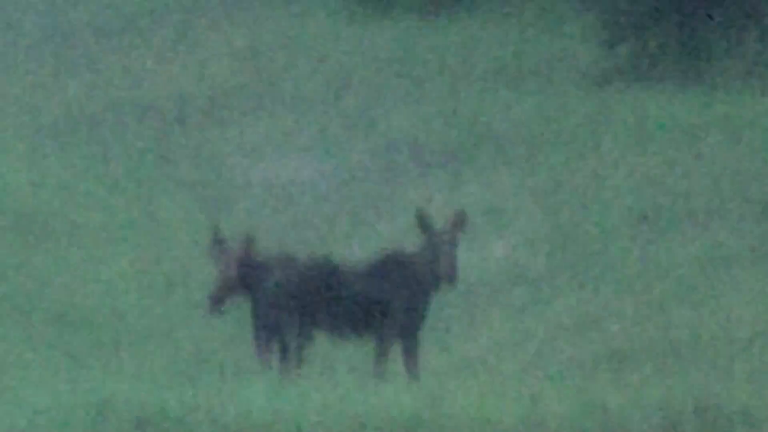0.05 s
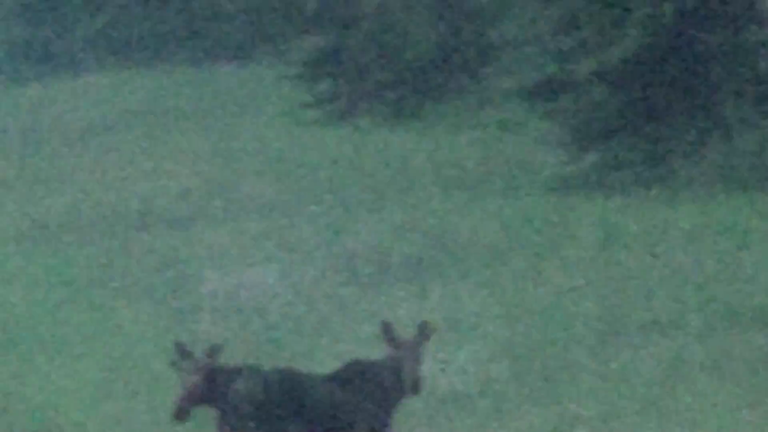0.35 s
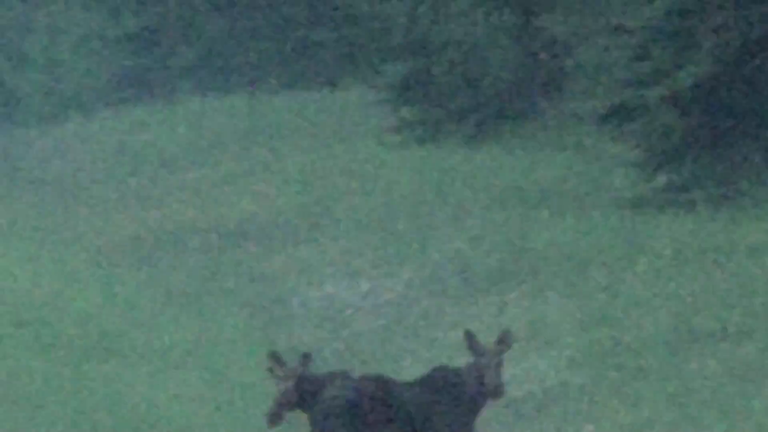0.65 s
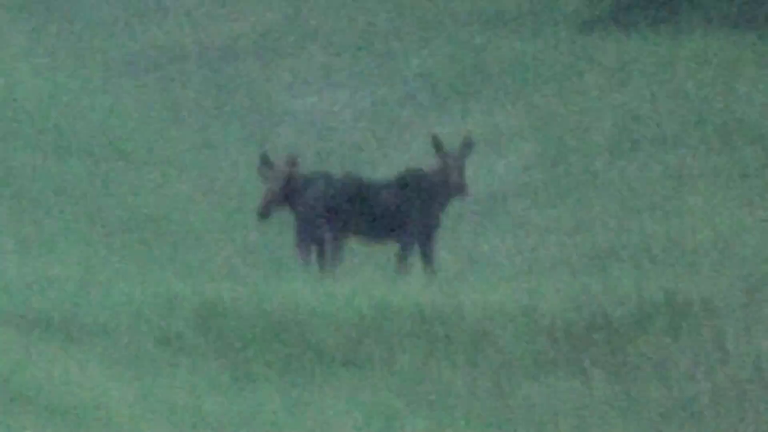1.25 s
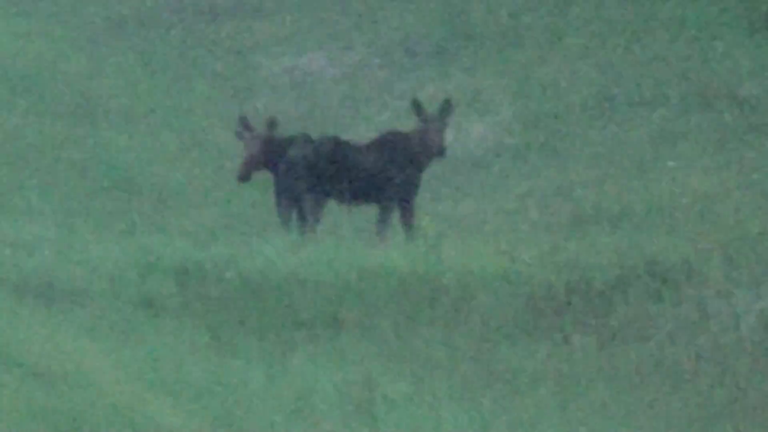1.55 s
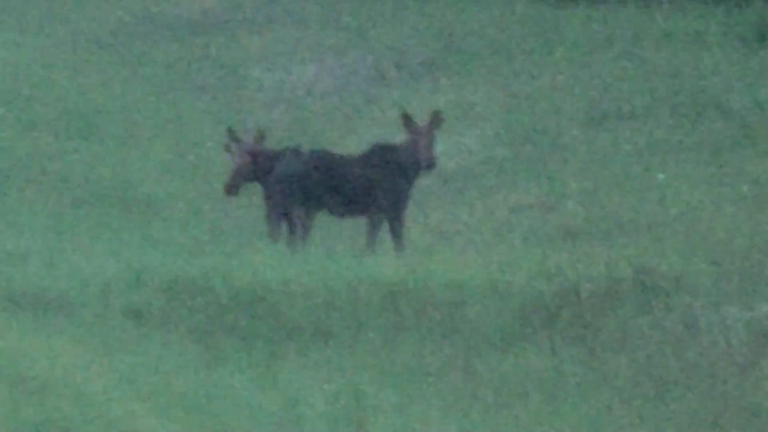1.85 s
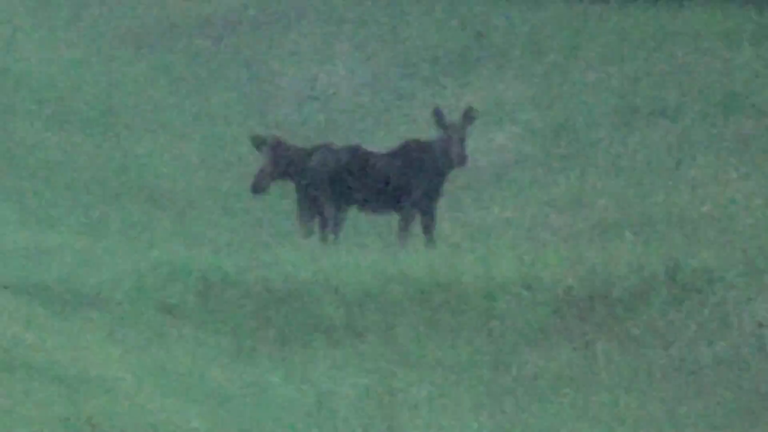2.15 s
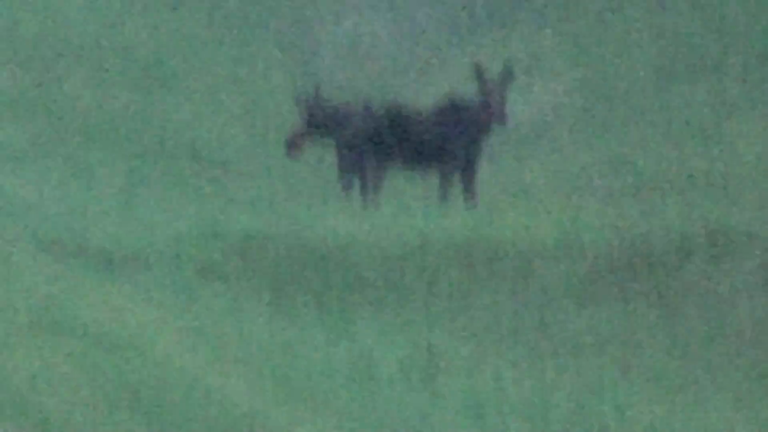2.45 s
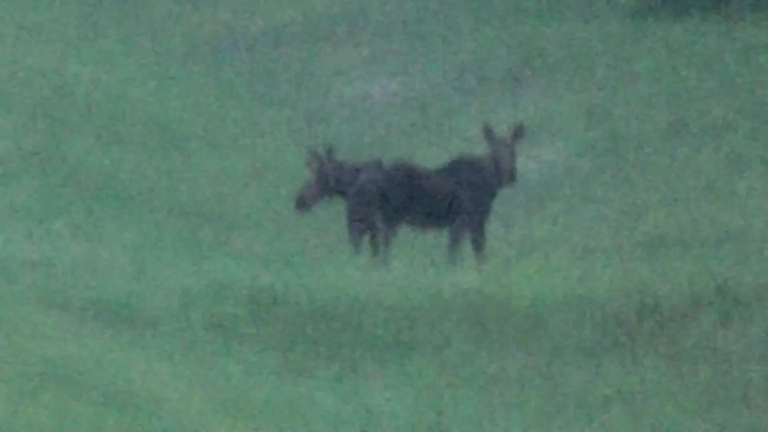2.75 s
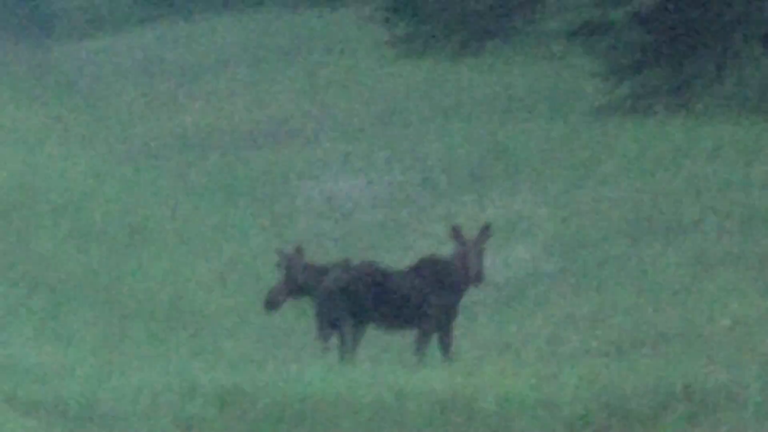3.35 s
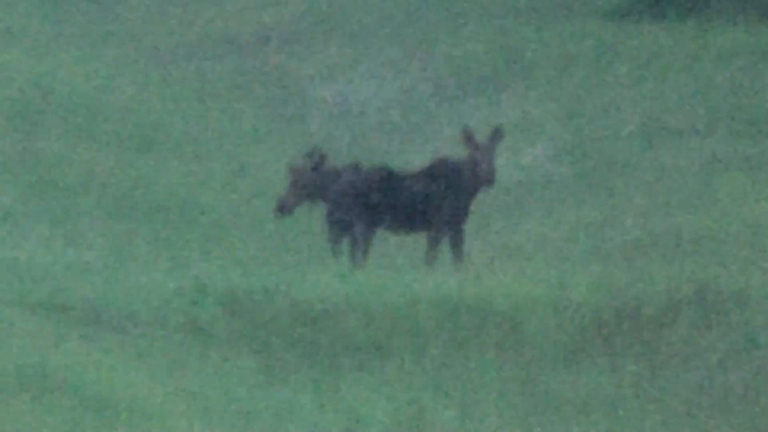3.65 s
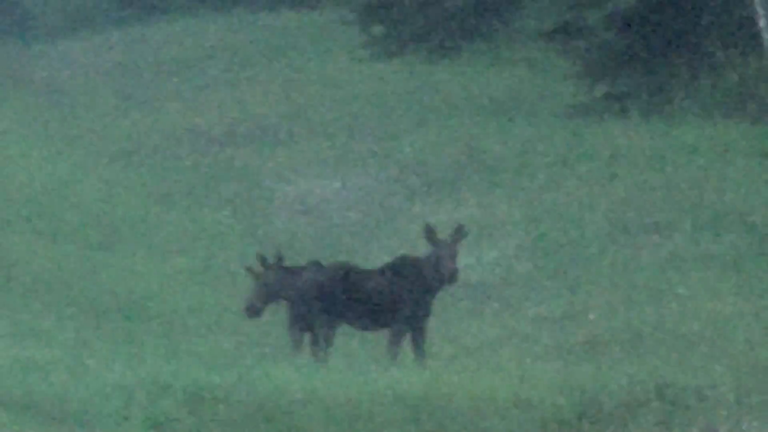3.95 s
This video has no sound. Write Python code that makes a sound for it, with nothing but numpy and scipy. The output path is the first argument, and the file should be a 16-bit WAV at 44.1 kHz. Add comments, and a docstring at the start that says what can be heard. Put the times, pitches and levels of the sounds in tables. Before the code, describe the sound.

One long moose call slides down in pitch, grows buzzier and drops into a growl, echoing faintly off trees. Small clicks and bumps from the hand-held camera follow, with far bird whistles and an even hiss outdoors.

```python
"""An open field: one long moose-like bellow. Vocal-fold pulses ring throat and muzzle in a slowly
sinking tone that turns rough three times, brightens as the mouth opens and drops into a short growl.
A faint echo comes back from the trees. A small bird whistles far away.
A hand-held camera clicks, bumps, rustles and whines over an even hiss."""
import sys
import numpy as np
from scipy import signal
from scipy.fft import rfft, irfft
from scipy.io import wavfile
from scipy.ndimage import uniform_filter1d

SR = 44100
rng = np.random.default_rng(int(sys.argv[2]) if len(sys.argv) > 2 else 0)


def dump_mix(stems):
    """Bounce the given channels to the path in sys.argv[1] as a 16-bit WAV at rate SR."""
    frames = np.atleast_2d(stems).T  # one column per channel
    limited = np.clip(frames, -1, 1)  # hard clip at full scale
    pcm = np.round(limited * 32767).astype(np.int16)
    wavfile.write(sys.argv[1], SR, pcm)


N = 176400


def undb(db):
    """Decibels to gain."""
    return 10 ** (np.asarray(db) / 20)


def unit(x):
    """Scale to rms 1."""
    return x / np.sqrt(np.mean(x ** 2))


def on_log(points, hz):
    """Interpolate (freq_hz, value) points on a log-frequency axis."""
    freqs, values = np.array(points, float).T
    return np.interp(np.log(hz + 1), np.log(freqs), values)


def curves(table, x):
    """Interpolate the other columns along the first."""
    axis, *columns = np.array(table).T
    return [np.interp(x, axis, column) for column in columns]


def swell(t, peak_s, spread_s):
    """Bell envelope, peak 1."""
    return np.exp(-((t - peak_s) / spread_s) ** 2)


def wander(rate_hz):
    """Smooth random drift, rms 1."""
    hold = max(int(SR / rate_hz), 2)
    steps = np.repeat(rng.standard_normal(N // hold + 1), hold)
    return unit(uniform_filter1d(uniform_filter1d(steps, hold), hold)[:N])


def band_noise(low_hz, high_hz):
    """Band-passed noise, rms 1."""
    sos = signal.butter(3, [low_hz, high_hz], "band", fs=SR, output="sos")
    return unit(signal.sosfilt(sos, rng.standard_normal(N)))


def below(hz, edge_hz, power=32):
    """Gain of a steep low-pass."""
    return 1 / np.sqrt(1 + (hz / edge_hz) ** power)


def resonance(hz, centre_hz, half_width_hz):
    """Complex gain of a resonance applied twice, 1 at the centre."""
    return 1 / (1 + 1j * (hz - centre_hz) / half_width_hz) ** 2


def tap(age_s, modes):
    """Decaying modes struck at age 0."""
    age_s = np.clip(age_s, 0, .5)
    attack = 1 - np.exp(-age_s / 0.00025)
    return attack * sum(undb(db - 60 * age_s / t60_s) * np.sin(2 * np.pi * hz * age_s)
                        for hz, db, t60_s in modes)


# freq_hz, gain_db
HISS_SPECTRUM = [(25, -15), (86, -4.5), (322, -4.5), (1200, -10.5), (15500, -17.5)]


def hiss(level_db=-54.5, side_db=-20):
    """Even hiss of field and camera, nearly mono."""
    shape = undb(on_log(HISS_SPECTRUM, np.fft.rfftfreq(N, 1 / SR)))
    mid, side = (unit(irfft(rfft(rng.standard_normal(N)) * shape, N)) for _ in range(2))
    return undb(level_db) * (mid + undb(side_db) * np.array([side, -side]))


def motor_whine(t, pitch_hz=2512, rms_db=-71):
    """Thin steady tone of the camera motor."""
    return np.sqrt(2) * undb(rms_db) * np.sin(2 * np.pi * pitch_hz * t)


# start_s, length_s, from_hz, to_hz, level_db
BIRD_NOTES = [(0.29, 0.12, 3600, 3020, -52), (0.665, 0.055, 3300, 2900, -59),
              (3.905, 0.22, 4330, 4480, -58.5)]


def bird(t):
    """Distant gliding whistles."""
    out = 0
    for start_s, length_s, from_hz, to_hz, db in BIRD_NOTES:
        progress = np.clip((t - start_s) / length_s, 0, 1)
        hz = from_hz + (to_hz - from_hz) * progress
        out += undb(db) * np.sin(np.pi * progress) * np.sin(2 * np.pi * np.cumsum(hz) / SR)
    return out


# peak_s, spread_s, level_db, centre_hz
GRIP_RUSTLES = [(.355, .03, -53, 1750), (3.37, .03, -55.5, 1100), (3.83, .04, -54.5, 1000)]


def grip_rustles(t, grain_rate_hz=130):
    """The grip rubs the camera: grainy octave-wide noise."""
    out = 0
    for peak_s, spread_s, db, hz in GRIP_RUSTLES:
        grains = np.abs(wander(grain_rate_hz))
        out += undb(db) * swell(t, peak_s, spread_s) * grains * band_noise(hz / 2 ** .5, hz * 2 ** .5)
    return out


# peak_s, spread_s, level_db
HAND_BUMPS = [(2.943, 0.02, -45.5), (3.552, .008, -52), (3.624, 0.0059, -50), (3.977, 0.0049, -49)]


def hand_bumps(t, pitch_hz=301, rub_db=-8.5):
    """The hand bumps the camera: soft thuds with rubbing noise."""
    out = 0
    for peak_s, spread_s, db in HAND_BUMPS:
        thud = np.sin(2 * np.pi * pitch_hz * t + .5 * wander(pitch_hz / 2))
        rub = undb(rub_db) * band_noise(pitch_hz, 800)
        out += undb(db) * swell(t, peak_s, spread_s) * (thud + rub)
    return out


# freq_hz, gain_db, t60_s
KNOCK_MODES = [(350, -7, 0.015), (726, 8.5, 0.019), (1010, 4, 0.0083)]


def camera_knock(t, start_s=3.0638, gain_db=-38.5):
    """One knock rings the low modes of the camera body."""
    return undb(gain_db) * tap(t - start_s, KNOCK_MODES)


# pitch_ratio, gain_db
SHELL_MODES = [(.84, -2.5), (1, 2.5), (1.14, 1.5), (1.551, -5.5)]
# start_s, gain_db, pitch_hz, left_minus_right_db
SHELL_CLICKS = [(0.1655, -33.5, 5150, 4), (0.1968, -30, 3720, 2.5), (0.311, -31, 5060, -4),
                (2.654, -30, 5060, 3), (3.0636, -33, 4930, 3), (3.7317, -28, 4000, 3.5)]


def shell_clicks(t, t60_s=0.0067):
    """The camera's plastic shell clicks and rings briefly."""
    out = np.zeros((2, N))
    for start_s, db, pitch_hz, pan_db in SHELL_CLICKS:
        modes = [(ratio * pitch_hz, mode_db, t60_s) for ratio, mode_db in SHELL_MODES]
        pan = undb([[pan_db / 2], [-pan_db / 2]])
        out += undb(db) * pan * tap(t - start_s, modes)
    return out


def tree_echo(call, t, level_db=-16.5, t60_s=0.47, delay_s=0.01):
    """The trees scatter the call back as a weak diffuse tail."""
    decay = undb(-60 * t / t60_s) * (t > delay_s)
    tails = [unit(decay * rng.standard_normal(N)) / np.sqrt(N) for _ in range(2)]
    mid, side = (signal.fftconvolve(call, tail)[:N] for tail in tails)
    return undb(level_db) * (mid + 0.45 * np.array([side, -side]))


# freq_hz, left_minus_right_db, left_lead_rad
MIC_BALANCE = [(150, 0.04, -0.13), (600, 0.5, -.42), (1200, 4, -0.47), (3500, 4.5, -0.88)]


def direct_path(call):
    """The call at the two microphone ports, louder on the left."""
    pan_db, lead_rad = curves(MIC_BALANCE, np.fft.rfftfreq(N, 1 / SR))
    ports = [undb(side * pan_db / 2) * np.exp(.5j * side * lead_rad) for side in (1, -1)]
    return np.array([irfft(rfft(call) * port, N) for port in ports])


# freq_hz, gain_db
THROAT_RESPONSE = [(40, -64), (110, -22), (170, -19.5), (220, -8.5), (290, -24), (420, -20), (520, -11.5),
                   (600, -6), (700, -17.5), (800, -4.5), (900, 1.5), (980, -16), (1060, -12.5),
                   (1170, -15.5), (1320, -9), (1500, -26.5)]
# centre_hz, half_width_hz, depth_db
REFLECTION_NOTCHES = [(469.8, 12, 21), (549.2, 6.5, 27.5), (742, 8.2, 33.5), (864.7, 54, 9.5)]
# centre_hz, half_width_hz
DELAYED_BANDS = [(830, 128), (1080, 84)]


def throat_and_reflections(source):
    """Throat and muzzle resonances; nearby reflections cut narrow notches into the call."""
    hz = np.fft.rfftfreq(16384, 1 / SR)
    notch_db = sum(db / (1 + ((hz - centre) / width) ** 2) for centre, width, db in REFLECTION_NOTCHES)
    cepstrum = irfft(np.log(undb(on_log(THROAT_RESPONSE, hz) - notch_db)))
    half = len(cepstrum) // 2
    cepstrum[1:half] *= 2  # fold to minimum phase
    cepstrum[half + 1:] = 0
    # two bands of each pulse arrive late
    lag_rad = 2 * sum(np.arctan((hz - centre) / width) + np.arctan((hz + centre) / width)
                      for centre, width in DELAYED_BANDS)
    impulse = irfft(np.exp(rfft(cepstrum) - 1j * lag_rad))[:half]
    return signal.fftconvolve(source, impulse)[:N]


# time_s, pitch_hz
FOLD_PITCH = [(0.0, 226.9), (0.091, 209.8), (0.25, 203), (0.449, 199.6), (0.558, 193.4), (0.635, 193.2),
              (0.744, 187), (0.925, 190.6), (0.975, 184.8), (1.048, 189.1), (1.193, 187.6), (1.279, 179.8),
              (1.361, 182.7), (1.524, 175.2), (1.619, 178.4), (1.701, 174.2), (1.814, 174.8), (1.9, 170.8),
              (2.2, 163.3), (2.454, 146.9), (2.499, 140.7), (2.571, 117.8), (2.676, 77)]
# start_s, end_s, sway_to_pitch_ratio, depth
ROUGH_STRETCHES = [(-.02, 0.1, 0.5, 0.36), (1.378, 1.66, 0.315, 0.34), (2.034, 2.21, 0.27, 0.12),
                   (2.492, 2.663, .37, .16)]
JITTER, GROWL_JITTER, QUAVER = 0.0015, 0.01258, 0.001214  # fractions of pitch


def vocal_folds(t, growl_s=2.5, fade_s=0.012, sway_rad=0.094, scatter=.15, shimmer=0.0076):
    """Fold cycles; in rough stretches a second vibration makes every few pulses strong and early."""
    growl = np.clip((t - growl_s) / 0.054, 0, 1)
    jitter = (JITTER + GROWL_JITTER * growl) * wander(150)
    pitch_hz = curves(FOLD_PITCH, t)[0] * (1 + jitter + QUAVER * wander(20))
    phase = 2 * np.pi * np.cumsum(pitch_hz) / SR
    uneven, slip_rad = (scatter * wander(60.3) for _ in range(2))
    sway = 0
    for start_s, end_s, ratio, depth in ROUGH_STRETCHES:
        gate = np.clip(np.minimum(t - start_s, end_s - t) / fade_s + .5, 0, 1)
        sway += depth * gate * (1 + uneven) * np.cos(ratio * phase + slip_rad)
    level_swing = sway + shimmer * wander(200)
    return pitch_hz, phase + sway_rad * sway, level_swing


def breath(phase, body, buzz, rasp, low_db=-24.5, high_db=-15.5):
    """Turbulent air, one puff per fold cycle."""
    high = buzz * band_noise(990, 3000) + rasp * band_noise(3600, 4700)
    low = body * band_noise(290, 2300)
    return (1 + np.cos(phase)) * (undb(low_db) * low + undb(high_db) * high)


# time_s, body_gain_db, body_edge_hz, buzz_gain_db, rasp_gain_db
CALL_EFFORT = [(0.0, -12.5, 990, -52, -61), (0.08, -19.5, 1170, -48, -44), (0.15, -17, 1205, -47, -37.5),
               (0.45, -15, 1247, -44.5, -44), (0.57, -15.5, 1178, -44, -35.5),
               (0.75, -19.5, 1249, -42, -33), (1.0, -16, 1212, -39.5, -29),
               (1.35, -17.5, 1191, -38.5, -30.5), (2.02, -16, 1216, -36, -33.5),
               (2.25, -14.5, 1224, -27, -24.5), (2.43, -16.5, 1281, -27, -25.5),
               (2.5, -17, 1324, -26, -22.5), (2.61, -20.5, 1398, -27.5, -15), (2.64, -24, 1358, -37, -26),
               (2.68, -64, 1385, -48, -65.0)]
# time_s, buzz_hz, rasp_hz
MOUTH_RESONANCES = [(.3, 2480, 3990), (1.1, 2110, 4083), (1.5, 1870, 3974), (2.3, 1775, 3830)]
# centre_hz, half_width_hz, gain_db, peak_s, spread_s
REEDY_OVERTONES = [(3030, 87, -40, .95, 0.7), (3590, 77, -34, 0.83, 0.61), (4620, 313, -35.5, 1.4, 1.0)]
BUZZ_BOOST_DB, RASP_BOOST_DB, GRUNT_DB = 8, 3.5, -21


def bellow(t, end_s=2.695, release_s=.04, full_swing_hz=597):
    """Fold pulses and breath ring the throat; two mouth resonances sink and grow; a grunt ends it."""
    pitch_hz, phase, level_swing = vocal_folds(t)
    body_db, edge_hz, buzz_db, rasp_db = curves(CALL_EFFORT, t)
    buzz_hz, rasp_hz = curves(MOUTH_RESONANCES, t)
    body, buzz, rasp = undb([body_db, buzz_db + BUZZ_BOOST_DB, rasp_db + RASP_BOOST_DB])
    grunt = undb(GRUNT_DB) * swell(t, peak_s=2.61, spread_s=0.11)
    reeds = [(centre, width, undb(db) * swell(t, peak_s, spread_s))
             for centre, width, db, peak_s, spread_s in REEDY_OVERTONES]
    pulses = 0
    for harmonic in range(1, 43):
        hz = harmonic * pitch_hz
        gain = buzz * resonance(hz, buzz_hz, half_width_hz=218) * (1 - below(hz, edge_hz))
        if harmonic <= 14:
            gain += body * below(hz, edge_hz) + grunt * below(hz, edge_hz=280, power=8)
        else:
            gain += rasp * resonance(hz, rasp_hz, half_width_hz=108)
            gain -= sum(level * resonance(hz, centre, width) for centre, width, level in reeds)
        strength = 1 + np.minimum(hz / full_swing_hz, 1) * level_swing
        pulses += strength * (gain * np.exp(1j * harmonic * phase)).real
    source = np.sqrt(2) * pulses + breath(phase, body, buzz, rasp)
    release = np.clip((end_s - t) / release_s, 0, 1)
    return throat_and_reflections(source * release)


def scene():
    """Bellow and echo over camera noises, bird and hiss."""
    t = np.arange(N) / SR
    call = bellow(t)
    animal = direct_path(call) + tree_echo(call, t)
    handling = shell_clicks(t) + camera_knock(t) + hand_bumps(t) + grip_rustles(t)
    return animal + handling + bird(t) + motor_whine(t) + hiss()


def record(dry):
    """Steep treble cut of the camera."""
    cutoff_hz = 15850
    return signal.sosfilt(signal.ellip(10, .1, 80, cutoff_hz, fs=SR, output="sos"), dry)


dry = scene()
out = record(dry)
dump_mix(out)
```